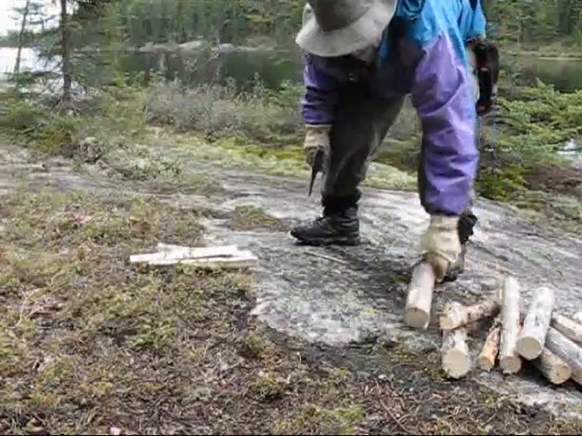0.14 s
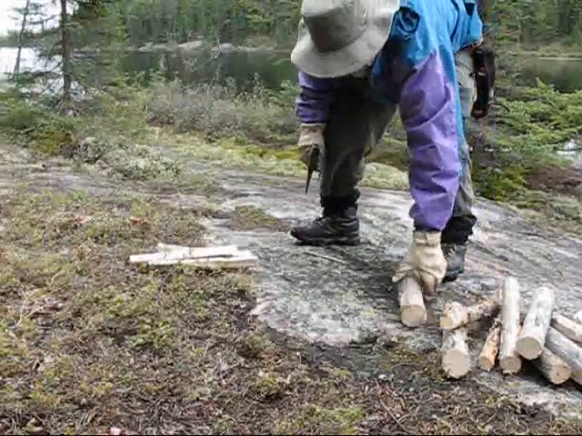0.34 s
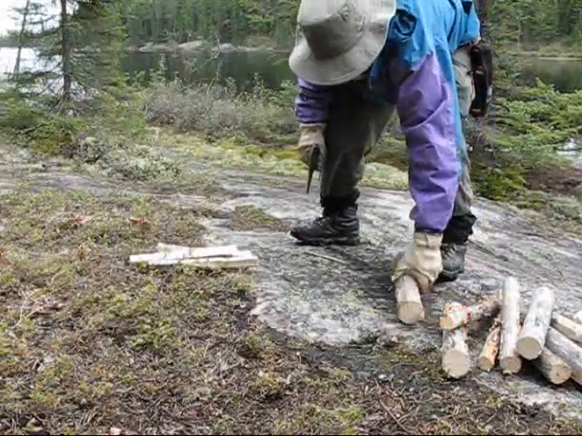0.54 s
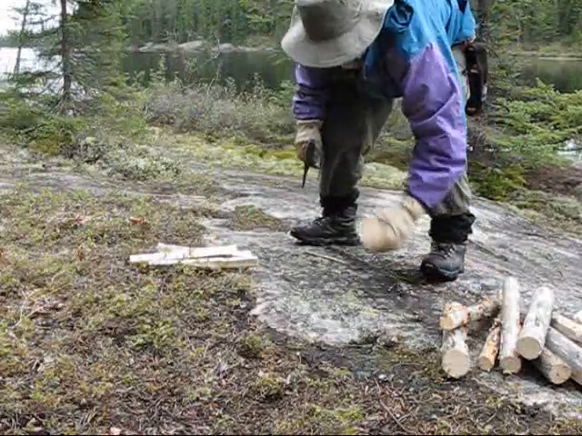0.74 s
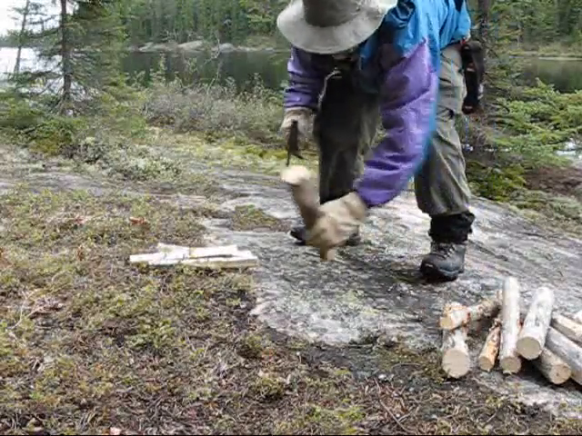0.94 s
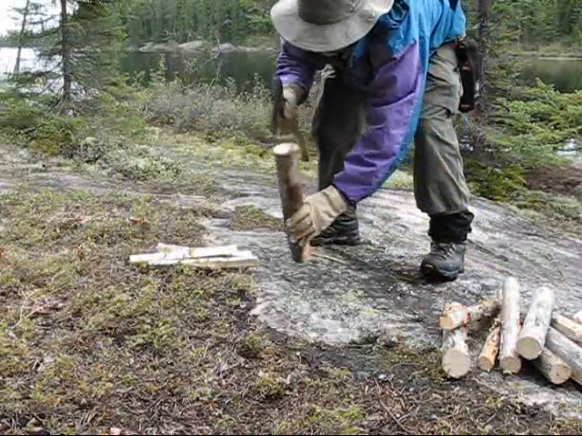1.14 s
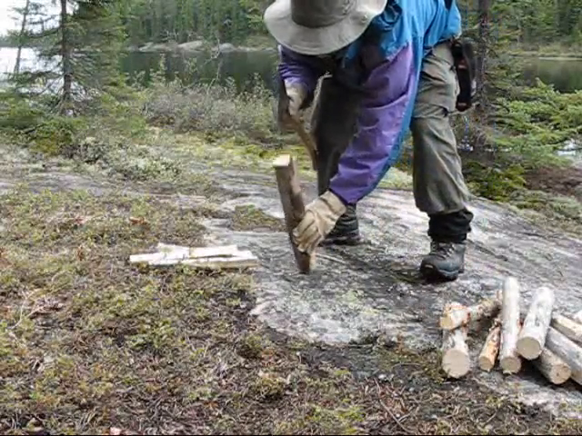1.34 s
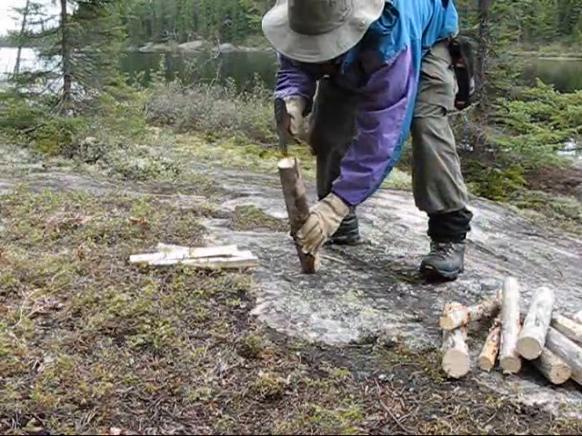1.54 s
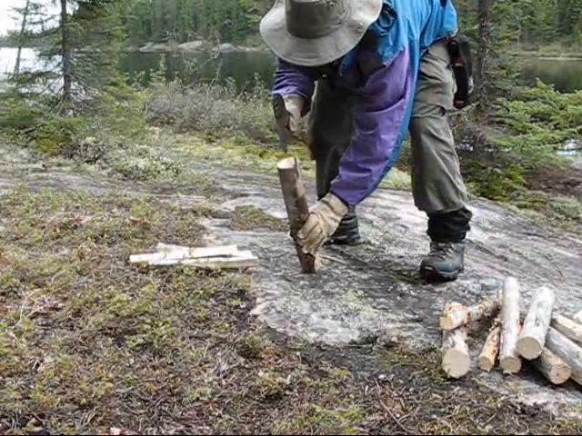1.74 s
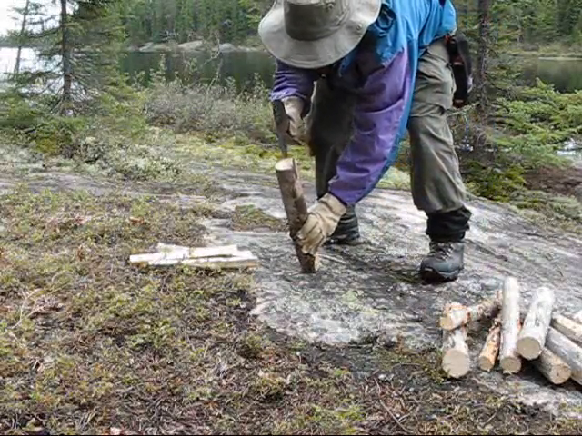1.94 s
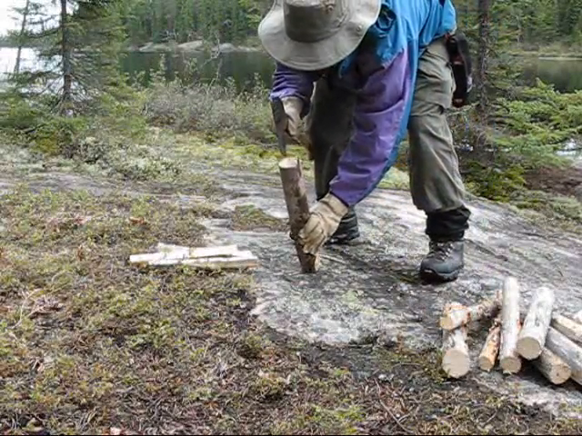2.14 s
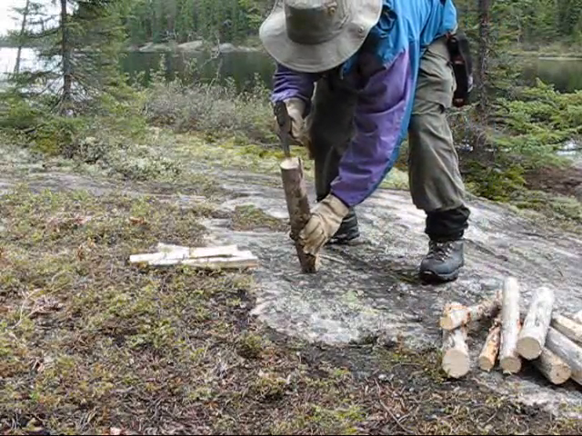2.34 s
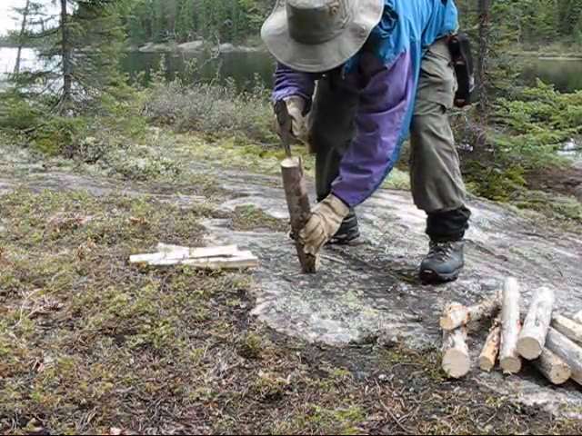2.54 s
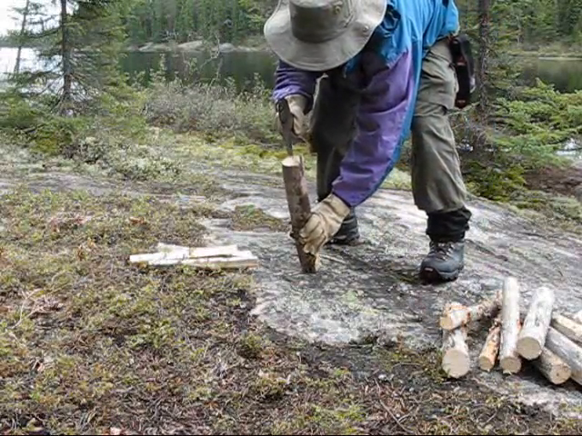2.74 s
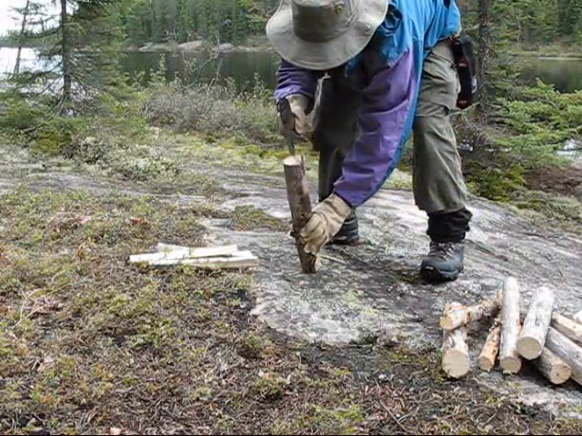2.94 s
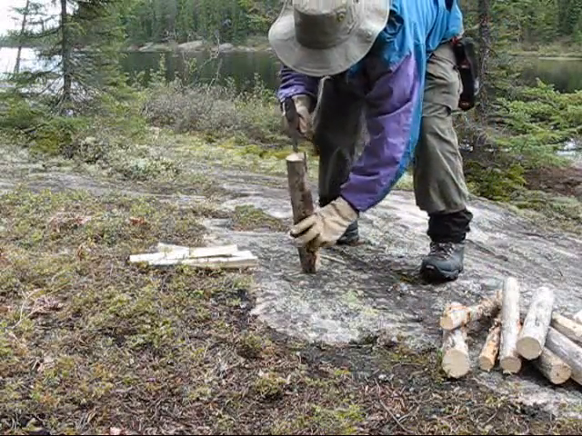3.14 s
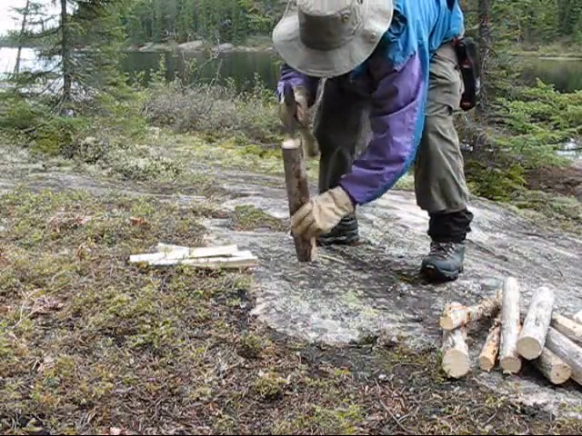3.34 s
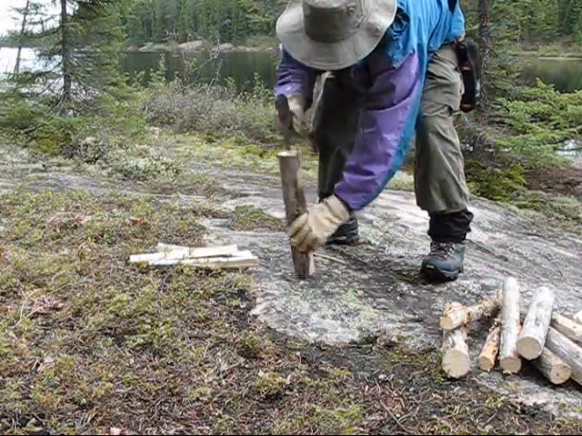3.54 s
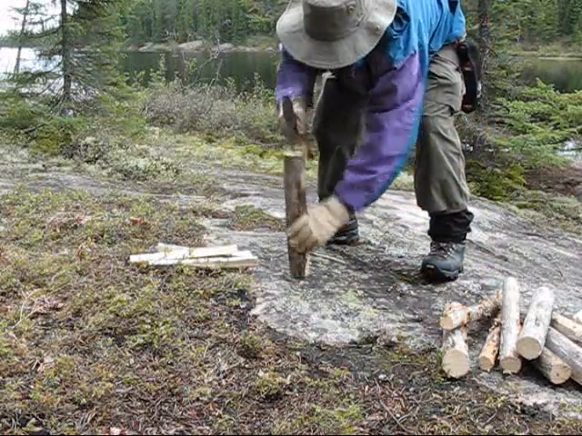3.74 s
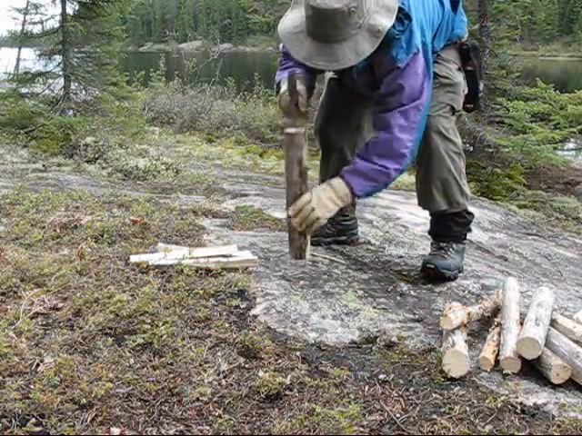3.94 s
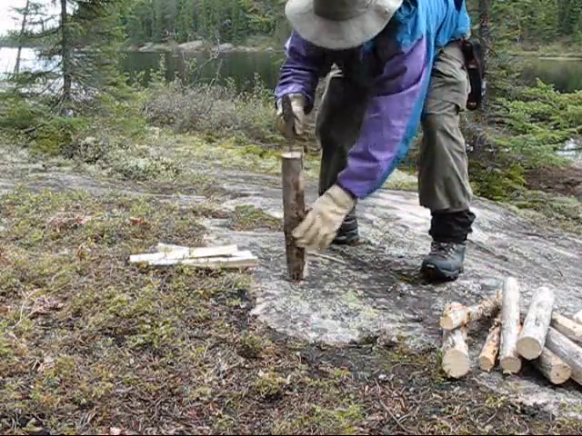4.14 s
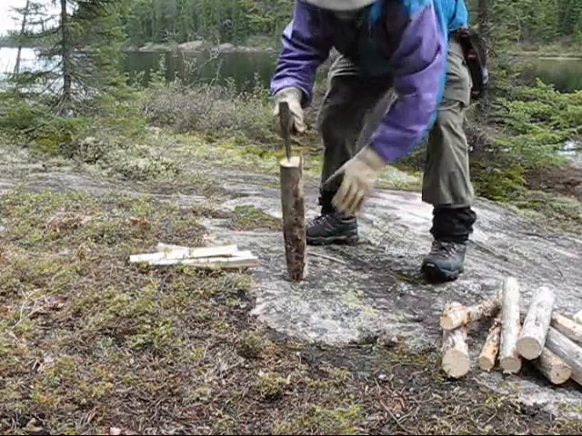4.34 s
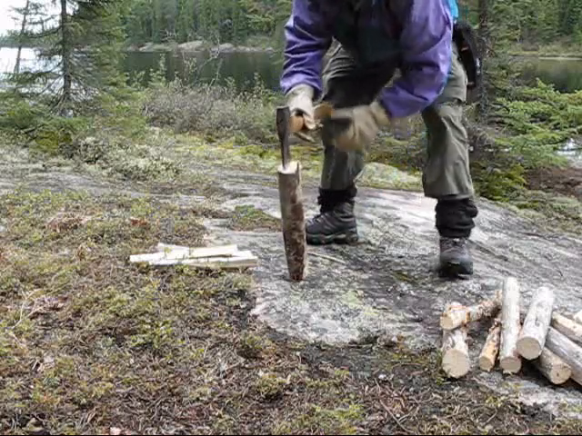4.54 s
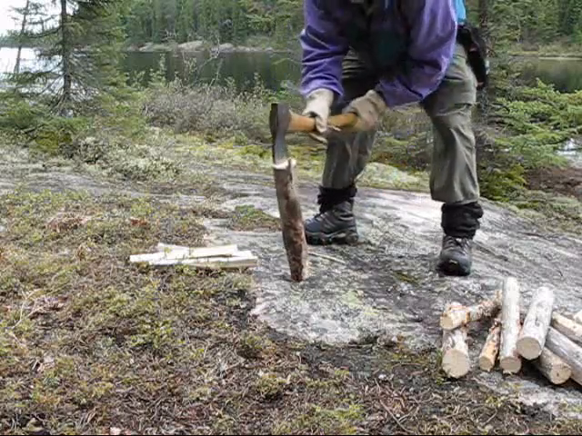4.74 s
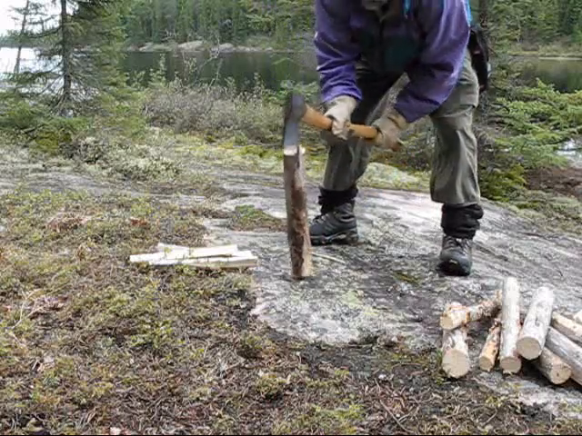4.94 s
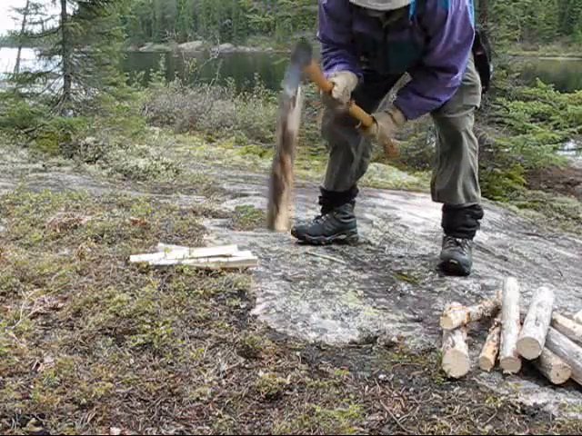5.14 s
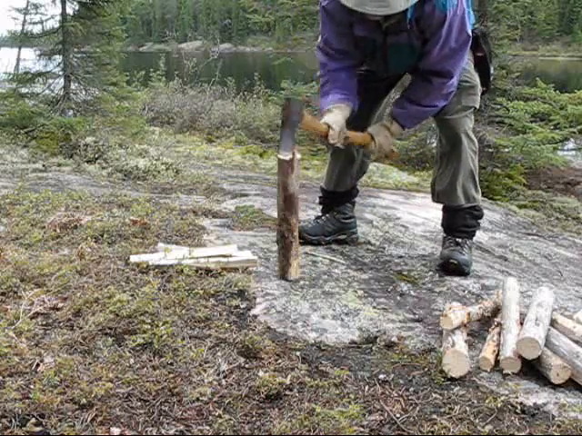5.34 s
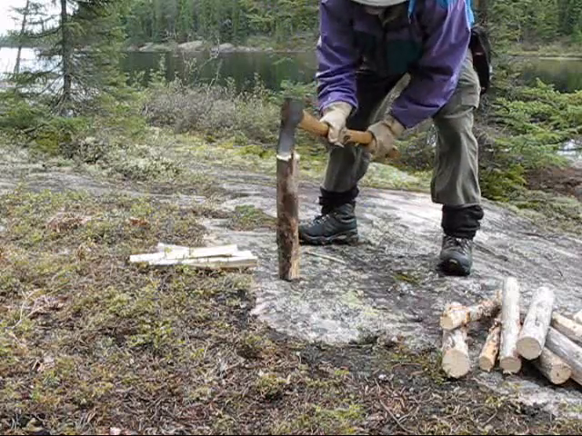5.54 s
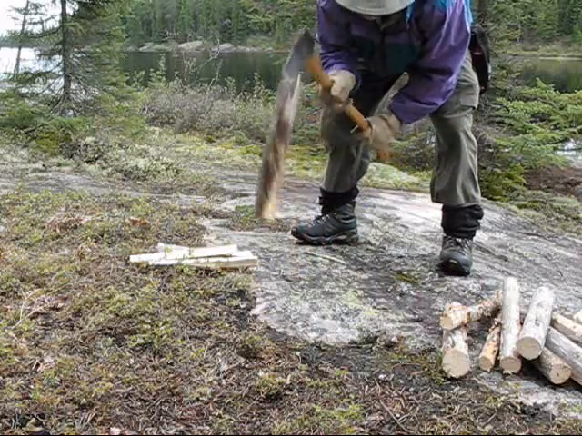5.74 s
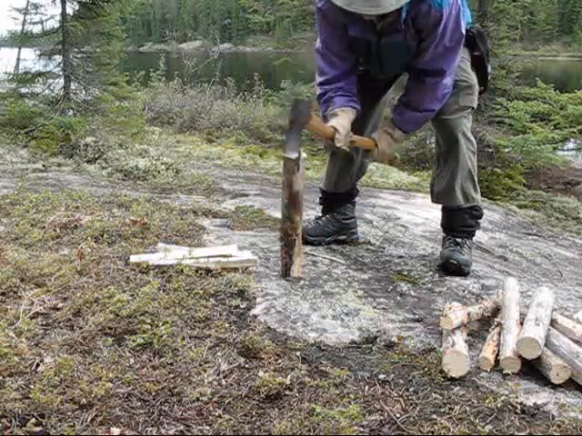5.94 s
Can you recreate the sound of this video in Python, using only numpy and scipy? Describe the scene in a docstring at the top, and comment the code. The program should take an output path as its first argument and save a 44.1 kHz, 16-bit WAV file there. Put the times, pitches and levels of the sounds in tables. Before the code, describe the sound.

Dry logs clink off a woodpile, birds call by a quiet lakeshore, then an axe and log knock hard on bare rock four times.

```python
"""A log clinks off the woodpile in a lake-shore hush, beside rustling cloth and a camera's thin whine.
Birds call in the trees, as pitch-curved sines smeared by scatter; jacket, glove and bark are coloured noise.
An axe is set into the log's end, and log and axe are knocked down on bare rock four times, close enough
to overload the small camera's microphone. Each knock rings a sum of dying wood modes, with tearing fibres
and a rebound; the ground, the nearest trees and the forest throw it faintly back."""
import sys
import numpy as np
from scipy import signal
from scipy.fft import rfft, irfft
from scipy.io import wavfile
from scipy.ndimage import uniform_filter1d

SR = 44100
rng = np.random.default_rng(int(sys.argv[2]) if len(sys.argv) > 2 else 0)


def dump(signal):
    """Clip the signal to [-1, 1] and save it as 16-bit WAV at the path in sys.argv[1]."""
    limited = np.clip(np.atleast_2d(signal).T, -1, 1)
    pcm = np.round(limited * 32767).astype(np.int16)
    wavfile.write(sys.argv[1], SR, pcm)


N = 264600
TIME = np.arange(N) / SR
BRIEF = TIME[:SR // 4]  # time axis of one short sound


def amp(db):
    """Decibels to gain."""
    return 10 ** (np.asarray(db) / 20)


def evened(x):
    """Scales to unit power."""
    return x / np.sqrt(np.mean(x ** 2) + 1e-20)


def read(points, hz):
    """Reads a spectrum on a log-frequency axis."""
    f, value = np.transpose(points)
    return np.interp(np.log(hz + 1), np.log(f + 1), value)


def add(mix, s, sound):
    """Mixes a sound in at a time."""
    part = mix[max(round(s * SR), 0):][:len(sound)]
    part += sound[:len(part)]


def coloured(x, spectrum):
    """Gives a noise a spectrum, at unit power."""
    gain = amp(read(spectrum, np.fft.rfftfreq(len(x), 1 / SR)))
    return evened(irfft(rfft(x) * gain, len(x)))


def band(count, hz, width_hz):
    """Noise in one resonance, at unit power."""
    f = np.fft.rfftfreq(count, 1 / SR)
    resonance = 1 / (1 + ((f - hz) / width_hz) ** 2)
    return evened(irfft(rfft(rng.standard_normal(count)) * resonance, count))


def dying(t60):
    """An exponential decay, 60 dB down after t60 seconds."""
    return np.exp(-np.log(1000) * BRIEF / max(t60, 1e-4))


def ring(modes):
    """The sum of a struck body's dying modes."""
    return sum(amp(db) * dying(t60) * np.cos(2 * np.pi * hz * BRIEF) for hz, db, t60 in modes)


def grains(count, spectrum, spread_db):
    """Friction noise: tiny slips of very unequal size."""
    size = evened(uniform_filter1d(rng.standard_normal(count), size=40))
    return coloured(rng.standard_normal(count) * amp(spread_db * size), spectrum)


def contact(x, hard_hz, low_hz):
    """A contact of finite length rounds off the treble; a light one drives little bass."""
    s = 1j * np.fft.rfftfreq(2 * len(x), 1 / SR)
    response = (s / (s + low_hz) / (1 + s / hard_hz)) ** 2
    return irfft(rfft(x, 2 * len(x)) * response)[:len(x)]


# spectrum of the open shore's hush: (f/Hz, relative level/dB per Hz)
HUSH_COLOUR = [(12, -44), (20, -9), (70, -7), (101, -8.5), (277, -8.5), (310, -8.5), (678, -10.5),
               (802, -10.5), (1910, -13.5), (2600, -14.5), (4180, -18.5), (9670, -25), (13500, -25.5),
               (14700, -25), (16000, -47)]
# narrow colours of the hush: (f/Hz, half width/Hz, level/dB)
HUSH_MODES = [(680, 50, -62), (885, 71, -63), (7840, 110, -69)]
# the camera's whine at its own microphone: (f/Hz, level/dB)
WHINE = [(4740, -69), (9480, -68), (14190, -100), (14222, -70.5)]


def background(air_db=-50.5, swell_db=-0.76, wander=0.000444, drone_db=-62.5, drone_late_db=-70,
               fade_at_s=2.7, fade_s=.35):
    """Lake-shore hush as swelling noise, a far drone that dies down, and the camera's wandering sines."""
    swell = swell_db * band(N, hz=0.54, width_hz=1.7)
    air = amp(air_db + swell) * coloured(rng.standard_normal(N), HUSH_COLOUR)
    hollow = sum(amp(db) * band(N, hz, width) for hz, width, db in HUSH_MODES)
    faded = (1 + np.tanh((TIME - fade_at_s) / fade_s)) / 2
    drone = amp(drone_db + (drone_late_db - drone_db) * faded) * band(N, hz=74, width_hz=4)
    turn = 2 * np.pi * np.cumsum(1 + wander * band(N, hz=2, width_hz=5.5)) / SR
    whine = sum(amp(db) * np.sqrt(2) * np.sin(hz * turn) for hz, db in WHINE)
    return air + hollow + drone + whine


# loose logs touching each other and the rock:
#   (t/s, ring level/dB, f/Hz, factor on the overtone, scuff level/dB, thud level/dB)
CLINKS = [(.0005, -31, 1800, 0.091, -50.5, -33), (0.044, -41, 1580, 0.77, -48, -68),
          (0.064, -46, 1610, .9, -45, -65), (.159, -33.5, 1575, 1.4, -41, -70),
          (0.264, -41, 1564, 0.61, -42.5, -23), (.429, -28.5, 1573, 0.54, -31, -58)]
# the two modes of a loose log: (multiple of its pitch, relative level/dB, t60/s)
BILLET = [(1, 4.5, 0.059), (2.08, 0.5, 0.042)]
# its thud on the ground: (f/Hz, relative level/dB, t60/s)
THUD = [(205, -2.5, 0.034), (584, -6, 0.0092), (770, -3.5, 0.01), (1260, -3, 0.0081), (1600, -6, 0.019)]


def woodpile(rise_s=0.0025, scuff_t60=0.027):
    """Dry logs graze each other, ring in two modes and thud on the ground."""
    out = np.zeros(N)
    (low_ratio, *low_mode), (high_ratio, *high_mode) = BILLET
    thud = contact(ring(THUD), hard_hz=2440, low_hz=25)
    for s, db, hz, overtone, scuff_db, thud_db in CLINKS:
        clink = ring([(hz * low_ratio, *low_mode)]) + overtone * ring([(hz * high_ratio, *high_mode)])
        soft_clink = clink * (1 - np.exp(-BRIEF / rise_s))
        scuff = band(len(BRIEF), hz=2300, width_hz=3600) * dying(scuff_t60)
        add(out, s, amp(db) * soft_clink + amp(scuff_db) * scuff + amp(thud_db) * thud)
    return out


# one swell of jacket rustle for each move of the arms: (t/s at its height, half length/s, level/dB)
MOVES = [(0.016, 0.077, -51.5), (0.17, 0.012, -44), (0.303, 0.065, -45.5), (0.907, 0.13, -53),
         (1.052, 0.066, -49), (2.345, 0.11, -60), (3.22, 0.16, -54.5), (3.72, 0.33, -57.5),
         (4.136, 0.063, -46.5), (4.572, 0.29, -50), (5.05, 0.47, -53.5), (5.467, 0.092, -47.5),
         (5.775, 0.082, -53), (5.99, 0.025, -44.5)]
# spectrum of the jacket: (f/Hz, relative level/dB per Hz)
RUSTLE_COLOUR = [(300, -1), (1500, 3.5), (4000, -1), (7000, -1), (11500, 1), (14000, -3.5), (16000, -13)]
# bark and grit snapping under glove and log: (t/s, level/dB, level of the low part against it/dB)
TICKS = [(1.484, -39, -18), (2.9502, -43.5, 2), (2.9817, -47, 3), (3.098, -42, 2), (3.158, -44.5, -12),
         (3.2247, -37, -3), (3.3493, -45, -19), (3.921, -41.5, -3), (5.0413, -36.5, -26),
         (5.2826, -45.5, 10), (5.9255, -52, 8.5)]
# a glove slips along the axe handle in two jerks: (t/s, length before it dies/s, level/dB)
SLIPS = [(4.674, 0.0055, -33.5), (4.697, 0.01, -35)]
# spectrum of the slipping glove: (f/Hz, relative level/dB per Hz)
SLIDE_COLOUR = [(59, -38), (100, -3), (350, -7.5), (583, -15.5), (2520, -4), (3400, -2.5), (4770, -14.5),
                (11400, -11), (16000, -24)]


def handling(tick_t60=0.026, still_db=-72, slip_rise_s=0.0018, slip_t60=0.091):
    """Friction noise of cloth swells with each move, the glove slips in jerks, and bark snaps."""
    swells = sum((amp(db) / (1 + ((TIME - s) / half) ** 2)) ** 2 for s, half, db in MOVES)
    cloth = np.sqrt(amp(still_db) ** 2 + swells)
    grip = np.zeros(N)
    for s, length, db in SLIPS:
        release = np.exp(-np.log(1000) * np.maximum(BRIEF - length, 0) / slip_t60)
        add(grip, s, amp(db) * np.minimum(BRIEF / slip_rise_s, 1) * release)
    rustle = cloth * grains(N, RUSTLE_COLOUR, spread_db=3.0)
    out = rustle + grip * grains(N, SLIDE_COLOUR, spread_db=2.0)
    for s, db, low_db in TICKS:
        bright = band(len(BRIEF), hz=9900, width_hz=5400)
        low = amp(low_db) * band(len(BRIEF), hz=2200, width_hz=1140)
        add(out, s, amp(db) * (bright + low) * dying(tick_t60))
    return out


def clearing(x, echo_s=.0228, echo_db=-27, echo_hz=1500, ground_db=-25, ground_t60=0.047):
    """One dull echo from the nearest trees and a short scatter from the rough ground."""
    scatter = rng.standard_normal(len(BRIEF)) * (dying(ground_t60) - dying(ground_t60 / 2))
    out = x + amp(ground_db) * signal.fftconvolve(x, scatter / np.linalg.norm(scatter))[:N]
    add(out, echo_s, amp(echo_db) * contact(x, echo_hz, low_hz=250))
    return out


# the forest's answer from among the trunks: (f/Hz, relative level/dB per Hz)
FOREST_COLOUR = [(100, -52), (400, -11), (900, 2), (1600, -5), (4000, -2.5), (8000, -14), (15000, 12.5)]
# how long each band of it lasts: (f/Hz, t60/s)
FOREST_T60 = [(200, 0.17), (1500, 0.56), (4000, 0.76), (12000, 0.12)]


def forest(x, build_s):
    """Scatter from trunks: it builds up with distance, and each band dies at its own speed."""
    taps = rng.standard_normal(SR) * (rng.random(SR) < .06)  # sparse reflections
    hz, t, z = signal.stft(taps, SR, nperseg=256)
    decay = np.exp(-np.log(1000) * t / read(FOREST_T60, hz)[:, None])
    z = z * amp(read(FOREST_COLOUR, hz))[:, None] * decay
    tail = signal.istft(z, SR, nperseg=256)[1][:SR]
    tail = tail * (1 - np.exp(-(TIME[:SR] / build_s) ** 2))
    return signal.fftconvolve(x, tail / np.linalg.norm(tail))[:N]


def tone(pitch):
    """A sine of unit power that follows a pitch curve."""
    return np.sqrt(2) * np.sin(2 * np.pi * np.cumsum(pitch) / SR)


def syllable(shape, hz, db, waver=0.013):
    """One nearly pure, slightly wavering note."""
    at, factor, shape_db = np.transpose(shape)
    t = TIME[:int(at[-1] * SR)]
    pitch = hz * np.interp(t, at, factor) * (1 + waver * band(len(t), hz=59.6, width_hz=25.4))
    level = amp(db + np.interp(t, at, shape_db))
    return level * signal.windows.tukey(len(t), .2) * tone(pitch)


# shapes of a falling slur, an upward flick and a soft low note:
#   (t/s from its start, factor on the pitch, relative level/dB)
SLUR = [(0, .98, -12), (.016, 1, 0), (.031, .92, -1), (.043, .82, -2), (.058, .74, -11)]
FLICK = [(0, .8, -10), (.011, .96, -3), (.019, 1.015, 1), (.035, 1, -1), (.055, .99, -10)]
COO = [(0, .97, 2), (.015, 1.015, 5.5), (.035, .99, -3), (.06, .95, -12)]
# a third bird's thin whistled notes, each higher than the last: (t/s, length/s, f/Hz, relative level/dB)
WHISTLES = [(0.119, 0.14, 6150, -49), (.44, 0.26, 6210, -58.5), (.73, 0.12, 6335, -50),
            (0.888, .09, 6420, -51), (1.01, .05, 6480, -54), (1.1, 0.12, 6500, -54)]
# soft notes of a farther bird: (shape, t/s, f/Hz, relative level/dB)
FAR_NOTES = [(COO, 1.415, 2600, -53), (SLUR, 1.468, 2550, -58), (COO, 1.648, 3060, -53),
             (COO, 1.94, 2540, -54), (COO, 2.011, 2850, -52), (COO, 2.2, 2630, -53),
             (COO, 2.341, 2740, -59), (SLUR, 2.43, 2490, -55), (COO, 2.531, 2620, -58),
             (SLUR, 2.59, 2420, -58), (COO, 3.09, 2830, -59), (COO, 3.169, 2860, -55)]
# the near bird's repeats of one phrase:
#   (t/s, relative level/dB, factor on the syllable spacing, number of the syllable that it skips)
PHRASES = [(3.229, -1.5, 1, None), (3.701, -1, .99, None), (4.166, 0, 1.005, None), (4.645, 0, 1.005, None),
           (5.122, .5, 1.055, 3)]
# the phrase, a falling slur, two soft low notes, a higher slur and an upward flick:
#   (shape, t/s into the phrase, f/Hz, climb from one phrase to the next/Hz, relative level/dB)
SYLLABLES = [(SLUR, 0, 3930, 10, -42.5), (COO, .156, 2555, 10, -53), (COO, .215, 2800, 13, -52.5),
             (SLUR, .306, 4040, 25, -43.5), (FLICK, .365, 4550, 115, -44)]


def birds(direct_db=-5, wet_db=0.5, whistle_db=-3, whistle_waver_hz=25):
    """Thin whistles, far soft notes and a phrase that climbs: sines all smeared by the trees."""
    out = np.zeros(N)
    flutter = whistle_waver_hz * band(N, hz=39.7, width_hz=29)
    for s, length, hz, db in WHISTLES:
        pitch = hz + flutter[round(s * SR):round((s + length) * SR)]
        add(out, s, amp(db + whistle_db) * signal.windows.tukey(len(pitch), .5) * tone(pitch))
    for shape, s, hz, db in FAR_NOTES:
        add(out, s, syllable(shape, hz, db))
    for repeat, (s, phrase_db, stretch, skipped) in enumerate(PHRASES):
        for number, (shape, after_s, hz, climb_hz, db) in enumerate(SYLLABLES):
            if number != skipped:
                add(out, s + stretch * after_s, syllable(shape, hz + repeat * climb_hz, phrase_db + db))
    return amp(direct_db) * out + amp(wet_db) * forest(out, build_s=0.0061)


# the knocks on the rock, close to the microphone:
#   (t/s, force level/dB, hardness of the contact as f/Hz, lowest pitch driven as f/Hz, factor on ring time,
#    lower cleft f/Hz, level/dB, upper cleft f/Hz, level/dB, rebound delay/s, rebound level/dB,
#    crack level/dB, falling grit level/dB)
KNOCKS = [(3.5728, -4.5, 3170, 246, 1.57, 1122, -2.5, 1890, -4.5, 0.0022, -7, -20, -50),
          (3.8394, 0.9, 5370, 5, 0.67, 746, -6.5, 2433, -3, .00342, -8.5, -27, -58),
          (4.1202, 1.6, 6900, 4.4, 0.87, 787, -11.5, 1300, 2.5, 0.001046, -9.5, -17.5, -57),
          (5.4376, -0.5, 6900, 230, 0.61, 1540, -0.5, 2650, 0.5, 0.001405, -11, -4.5, -38.5)]
# modes of the log with the axe in it: (f/Hz, relative level/dB, t60/s before the factor on ring time)
LOG = [(189, -12.3, .028), (345, -21, .042), (577, -6.3, .0146), (661, -19, .055), (722, -1.5, .013),
       (891, -12.1, .04), (1220, -8, .024), (1490, -9, .0073), (1740, -8.5, .0185), (1930, -16.5, .035),
       (2390, -13.5, .026), (2830, -15.2, .026), (3330, -8.5, .012)]
# spectrum of tearing fibres: (f/Hz, relative level/dB per Hz)
CRACK_COLOUR = [(1200, -20), (2800, -2), (5000, -1), (6500, -3), (7700, -1), (8800, -3), (10600, 4),
                (12100, -8), (16000, -16)]


def knocks(cleft_t60=0.023, push_t60=0.00029, rebound_hz=4500, crack_t60=0.019, grit_t60=0.31,
           thump_db=-51, thump_hz=42, thump_t60=.11):
    """Each blow shoves and rings the log and the cleft round the blade; fibres crack, it rebounds, grit falls."""
    out = np.zeros(N)
    for (s, db, hard_hz, low_hz, hold, lower_hz, lower_db, upper_hz, upper_db,
         rebound_s, rebound_db, crack_db, grit_db) in KNOCKS:
        cleft = [(lower_hz, lower_db, cleft_t60), (upper_hz, upper_db, cleft_t60)]
        modes = [(hz, mode_db, t60 * hold) for hz, mode_db, t60 in list(LOG) + cleft]
        body = ring(modes) + dying(push_t60)
        wood = amp(db) * contact(body, hard_hz, low_hz)
        crack = amp(crack_db) * grains(len(BRIEF), CRACK_COLOUR, spread_db=2.5) * dying(crack_t60)
        grit = amp(grit_db) * band(len(BRIEF), hz=10900, width_hz=1200) * dying(grit_t60)
        thump = ring([(thump_hz, db + thump_db, thump_t60)])
        add(out, s, wood + crack + grit + thump)
        rebound = contact(wood, rebound_hz, low_hz=3.6)  # the second contact is softer
        add(out, s + rebound_s, amp(rebound_db) * rebound)
    return out


def scene(forest_db=-2, forest_hz=3000, depth_s=.04):
    """Work on the rock, its echoes, birds and background."""
    work = woodpile() + handling() + knocks()
    spread = np.zeros(N)  # summed over all directions, a knock reaches the trees as a broad clap
    for s, db, *_ in KNOCKS:
        clap = contact(signal.unit_impulse(2048), forest_hz, low_hz=200)
        add(spread, s, amp(db / 2) * clap)
    answer = amp(forest_db) * forest(spread, build_s=depth_s)
    return (background() + clearing(work) + birds() + answer)[None]


def record(dry, edge_hz=16100):
    """The microphone overloads at full scale; then the treble is cut off at the band edge."""
    clipped = np.clip(dry, -1, 1)
    lowpass = signal.firwin(511, edge_hz, window=("kaiser", 9), fs=SR)
    return signal.oaconvolve(clipped, lowpass[None], "same")


dry = scene()
out = record(dry)
dump(out)
```